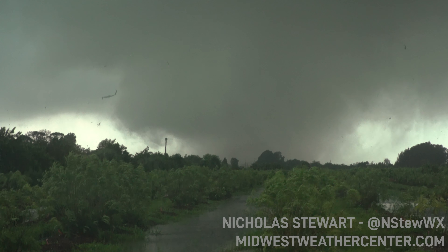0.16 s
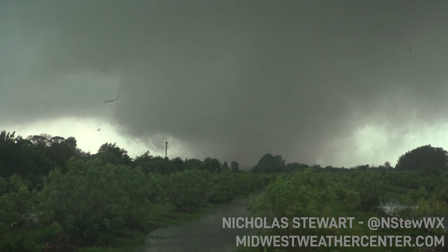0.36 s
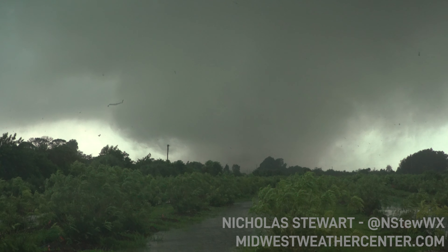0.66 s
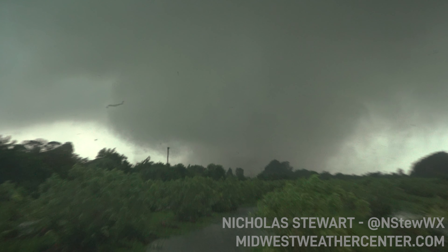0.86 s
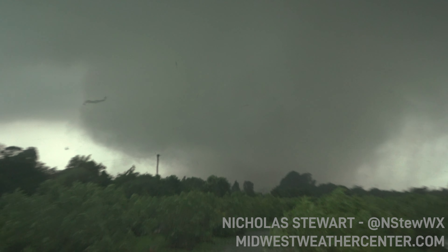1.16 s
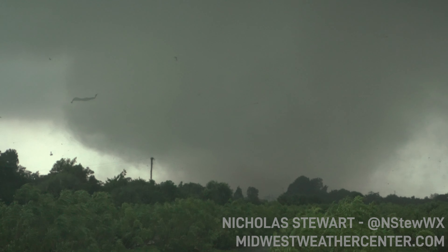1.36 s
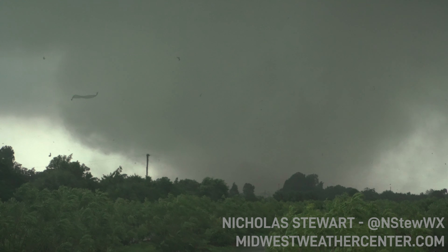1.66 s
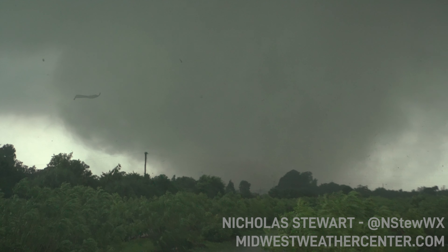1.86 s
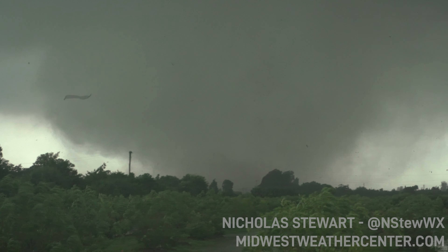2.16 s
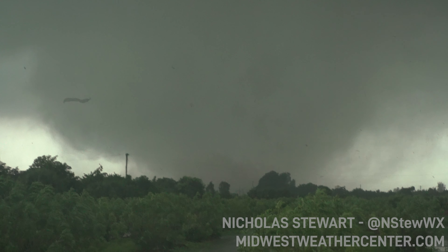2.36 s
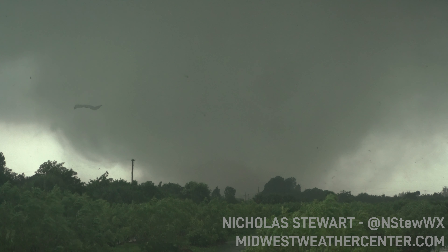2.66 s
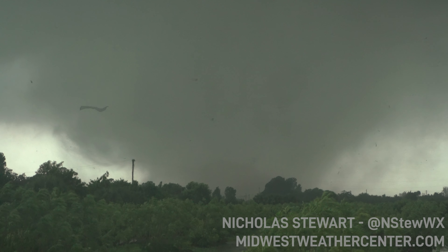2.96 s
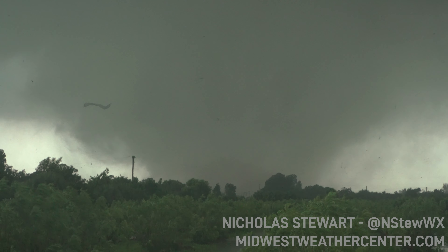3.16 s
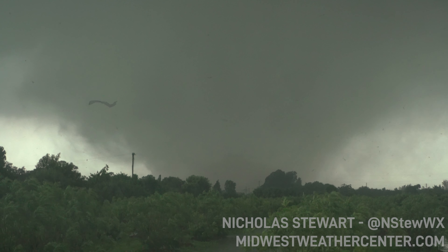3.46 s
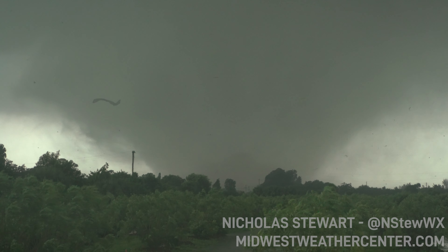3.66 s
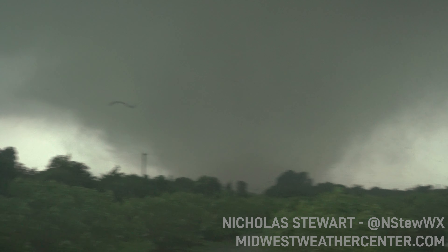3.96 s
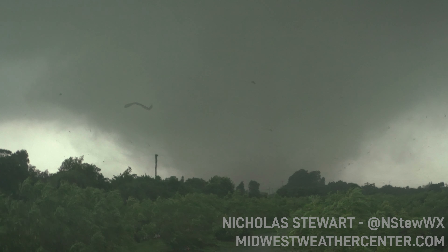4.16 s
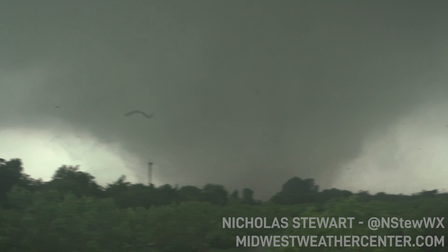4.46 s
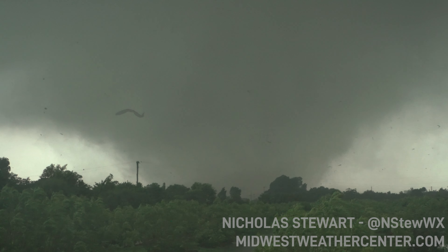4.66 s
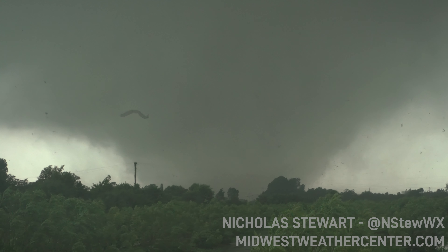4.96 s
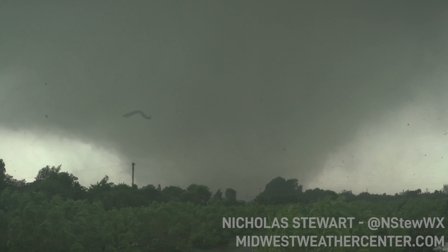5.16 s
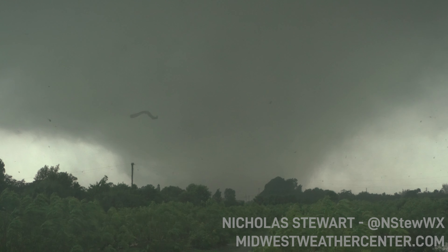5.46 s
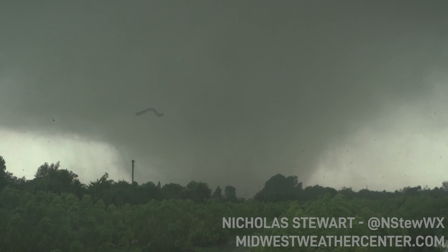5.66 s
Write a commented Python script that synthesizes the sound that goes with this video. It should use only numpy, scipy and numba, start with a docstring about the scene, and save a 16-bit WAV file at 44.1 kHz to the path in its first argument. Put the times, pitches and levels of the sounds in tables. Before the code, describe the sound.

Outdoors in open country, low, fluttering wind pounds the microphone over the constant deep roar of a far tornado. A small close mechanism gives a tick, a soft swish and a crisp snap. The gusts swell to their strongest, ease, then build again as the mechanism snaps a second time. Bushes hiss and insects trill barely audibly, and a distant bird peeps faintly near the end.

```python
"""A tornado roars steadily across open country, and its inflow wind buffets the microphone in deep gusts.
The hardest gusts duck the recorder's gain, which then creeps back. Behind the wind, leaves hiss in the
bushes, two insects trill and tick in the grass, and a bird peeps far off. Twice, close to the
microphone, a small mechanism ticks, slides with a soft swish and latches."""
import sys
import numpy as np
from scipy import signal
from scipy.fft import rfft, irfft
from scipy.io import wavfile
from scipy.ndimage import uniform_filter1d
from numba import njit

SR = 44100
rng = np.random.default_rng(int(sys.argv[2]) if len(sys.argv) > 2 else 0)


def dump_mix(stems):
    """Bounce the given channels to the path in sys.argv[1] as a 16-bit WAV at rate SR."""
    frames = np.atleast_2d(stems).T  # one column per channel
    limited = np.clip(frames, -1, 1)  # hard clip at full scale
    pcm = np.round(limited * 32767).astype(np.int16)
    wavfile.write(sys.argv[1], SR, pcm)


N = 255780
TIME = np.arange(N) / SR

# notes of the far bird: t/s, length/s, f/Hz, level/dB
BIRD_NOTES = [(0.03, .04, 3470, -61), (0.175, .055, 3470, -62), (5.47, .16, 1855, -55)]
# trills in the grass: t/s, length/s, level/dB
INSECT_TRILLS = [(0, .18, -78), (.45, 0.25, -73), (.72, .58, -77), (1.876, 0.86, -77.5),
                 (3.05, 0.71, -75.5), (3.846, .33, -74), (4.25, .4, -75.5), (5.22, .6, -74)]
# leaf hiss from the bushes: f/Hz, level/dB
LEAF_SPECTRUM = [(2000, -20), (3600, 3), (4600, 0), (5500, 5), (6400, -4), (7500, -1.5), (8300, -6),
                 (9200, -7), (10700, -15.5), (12000, -11.5), (14000, -19.5), (15500, -15)]

# cycles of the close mechanism: start t/s, catch t/s, latch t/s, swish level/dB, tick level/dB,
# catch level/dB, snap level/dB, snap f/Hz
LATCH_CYCLES = [(0.786, 1.4062, 1.4315, -66.5, -39, -30.5, -19, 5700),
                (4.109, 4.7282, 4.7515, -68.5, -44, -33.5, -17.5, 7200)]
# rubbing of its slide: f/Hz, level/dB
SLIDE_SPECTRUM = [(2000, -22), (4000, 4.5), (7500, 1.5), (10500, -3.5), (12300, -0.5), (14500, -9),
                  (15800, -9.5)]
# colour of its casing: f/Hz, level/dB
CASING_SPECTRUM = [(1100, -5), (1800, 1), (3000, 0), (4500, -2), (7700, -2), (9000, -12), (12000, -19),
                   (15500, -31)]
# low modes of the casing: f/Hz, level/dB, decay/s
KNOCK_MODES = [(1570, -4, .004), (1760, 0, 0.0039), (2530, 0, 0.0027), (3070, -5, 0.0018)]
# blows on the casing: t/s, level/dB, tilt/(dB per octave)
CASING_KNOCKS = [(0.787, -46, 1), (1.4075, -45, 0), (1.4325, -35.5, -10), (4.7287, -40, 7)]
# the snap and its chatter: t/s from the latch, level/dB against the snap, ratio to the snap's pitch
SNAP_CHATTER = [(-.006, -15.5, .85), (0, 0, 1), (.0048, -11.5, .95), (.0112, -14, .82)]

# the distant funnel: t/s, rumble level/dB, roar level/dB, rush level/dB
FUNNEL_LEVELS = [(0, -36, -37.5, -48.5), (.38, -36, -34, -47), (.65, -34.5, -37, -47),
                 (1.05, -30, -32.5, -45.5), (1.5, -31, -34.5, -46.5), (2.1, -34, -33, -46.5),
                 (2.33, -34, -33, -47.3), (2.55, -31, -35, -47.5), (3.0, -26.5, -33, -47),
                 (3.8, -32, -34, -47), (4.35, -31.5, -32.5, -46), (5.1, -31.5, -32, -46.5),
                 (5.8, -37.5, -33.5, -46.5)]
# its low rumble: f/Hz, level/dB
RUMBLE_SPECTRUM = [(70, -19), (125, -1.5), (170, 1), (240, -5), (300, -7.5), (450, -26)]
# its midrange roar: f/Hz, level/dB
ROAR_SPECTRUM = [(180, -24.5), (250, -2.5), (310, -1), (400, -2), (520, -5), (750, -11.5), (1000, -22),
                 (1500, -30.5), (3000, -56)]
# its rushing air: f/Hz, level/dB
RUSH_SPECTRUM = [(400, -13.5), (750, 0), (1000, 1.5), (1350, -4.5), (1750, -6.5), (2400, -12.5),
                 (2750, -15), (3000, -12), (3200, -16), (3550, -16.5), (4200, -26), (6000, -44)]

# steady wind on the microphone: t/s, level/dB
WIND_LEVELS = [(0, -32.5), (.45, -23.5), (.7, -24), (1.1, -21.5), (1.75, -19), (2.15, -20), (3.05, -15.5),
               (3.4, -19.5), (3.6, -23.5), (4.15, -20), (4.9, -17), (5.45, -14.5), (5.8, -18.5)]
# brief lulls in that wind: centre t/s, level change/dB
WIND_LULLS = [(1.5, -4), (2.165, -6), (2.82, -7), (2.985, -10), (3.12, -13), (4.02, -11), (4.211, -14.5),
              (4.52, -19), (5.0, -9), (5.1, -10), (5.425, -7)]
# gusts on top of it: centre t/s, length/s, level/dB, fast eddies' share of the power (0-1)
WIND_GUSTS = [(.82, 0.15, -20.5, 0.77), (0.998, 0.069, -21, 0.95), (1.171, 0.031, -13.5, 0.1),
              (1.297, 0.13, -16.5, 0.35), (1.419, 0.078, -13, 0.2), (1.585, 0.059, -11.5, 0.07),
              (2.344, 0.071, -10, 0), (2.477, 0.084, -6, 0.02), (2.629, 0.079, -5, 0.17),
              (2.731, 0.11, -6, 0.12), (2.899, 0.13, -6, 0.05), (4.287, 0.031, -13, 0.04),
              (4.37, 0.11, -15, 1), (4.645, 0.16, -13, 0.75), (4.722, 0.13, -12.5, 0.42),
              (4.872, 0.085, -15, 0.77), (5.2, 0.12, -14, 0.46), (5.318, 0.093, -9, 0),
              (5.503, .16, -15.5, 0.9), (5.626, 0.2, -12.5, 0.8), (5.746, 0.15, -10, 0.18)]
# large, deep eddies at the microphone: f/Hz, level/dB
DEEP_EDDY_SPECTRUM = [(8, -27), (15, -15), (26, -1), (44, 3), (58, -3.5), (75, -18), (120, -47)]
# small, fast eddies at the microphone: f/Hz, level/dB
FAST_EDDY_SPECTRUM = [(35, -23), (55, 1.5), (68, -0.5), (100, -4.5), (135, -13), (200, -28), (400, -45.5),
                      (900, -57)]


def undb(db):
    """Decibels to gain."""
    return 10 ** (np.asarray(db) / 20)


def unit(x):
    """Scale to rms 1."""
    return x / np.sqrt(np.mean(x ** 2))


def curves(table):
    """Each column after the first as a curve in time."""
    times, *columns = np.transpose(table)
    return [np.interp(TIME, times, column) for column in columns]


def envelope(start, attack_s, length_s, release_s):
    """Rise from the start, hold until the length is over, then fall."""
    age = TIME - start
    return np.clip(np.minimum(age / attack_s, 1 - (age - length_s) / release_s), 0, 1)


def arch(centre, length_s):
    """Half a sine wave of height 1 around the centre."""
    return np.cos(np.pi * np.clip((TIME - centre) / length_s, -.5, .5))


def drift(rate_hz):
    """Smooth random drift of rms 1, changing about rate_hz times a second."""
    hz = np.arange(N // 2 + 1) * SR / N
    return unit(irfft(rfft(rng.standard_normal(N)) * np.exp(-(hz / rate_hz) ** 2) * (hz > 0), N))


def colour(x, spectrum):
    """Filter by (f/Hz, level/dB) points, falling steeply beyond the ends; rms 1."""
    hz, db = np.transpose(spectrum)
    bins = np.maximum(np.arange(len(x) // 2 + 1) * SR / len(x), 1)
    gain = undb(np.interp(np.log(bins), np.log(hz), db))
    skirts = np.minimum(bins / hz[0], 1) ** 2 * np.minimum(hz[-1] / bins, 1) ** 2
    return unit(irfft(rfft(x) * gain * skirts, len(x)))


def churn(spectrum, depth_db, rate_hz, octaves=9):
    """Noise whose octaves swell and sink separately."""
    noise = rfft(rng.standard_normal(N))
    hz = np.arange(len(noise)) * SR / N
    octave = np.clip(np.log2(hz / 60 + 1e-9), 0, octaves - 1)
    bands = (irfft(noise * np.maximum(1 - abs(octave - k), 0), N) for k in range(octaves))
    return colour(sum(band * undb(depth_db * drift(rate_hz)) for band in bands), spectrum)


def eddies(spectrum, span_s):
    """Pressure swings of an unbroken train of eddies, about equally strong over each span."""
    pressure = colour(rng.standard_normal(N), spectrum)
    local_power = uniform_filter1d(abs(signal.hilbert(pressure)) ** 2, int(span_s * SR))
    return colour(pressure / np.sqrt(local_power), [(10, 0), (1000, 0)])


def far_bird(sag=.04):
    """Thin, nearly pure notes from far off, each sagging a little in pitch."""
    wobble = 1 + .0054 * drift(60)
    out = np.zeros(N)
    for start, length_s, hz, level_db in BIRD_NOTES:
        progress = np.clip((TIME - start) / length_s, 0, 1)
        pitch = hz * wobble * (1 - sag * (progress - .5))
        tone = np.sqrt(2) * np.sin(2 * np.pi * np.cumsum(pitch) / SR)
        out += undb(level_db) * np.sin(np.pi * progress) * tone
    return out


def ticking_insect(pulse_hz=23.5, length_s=.022, level_db=-85):
    """An insect in the grass flutters in short, even pulses, very high and faint."""
    voice = [(9800, -12), (11500, 0), (12300, 0), (13800, -6), (15000, -18)]  # f/Hz, level/dB
    cycles = np.cumsum(pulse_hz * (1 + .02 * drift(3))) / SR
    age_s = cycles % 1 / pulse_hz
    pulses = np.sin(np.pi * np.minimum(age_s / length_s, 1)) * undb(1.5 * drift(15))
    return undb(level_db) * colour(pulses * rng.standard_normal(N), voice)


def trilling_insect(carrier_hz=9090, stroke_hz=63, bend_hz=220, waver_hz=50, idle_db=-81):
    """Another trills in the grass; each wing stroke is a short high note that arches in pitch."""
    effort = undb(idle_db)  # it never quite stops
    for start, length_s, level_db in INSECT_TRILLS:
        effort = np.maximum(effort, undb(level_db) * envelope(start, .083, length_s, .17))
    stroke_phase = np.cumsum(stroke_hz * (1 + .008 * drift(6))) / SR % 1
    pressure = np.sin(np.pi * stroke_phase) ** 2
    hz = carrier_hz + bend_hz * (pressure - .8) + waver_hz * drift(250)
    tone = np.sin(2 * np.pi * np.cumsum(hz) / SR)
    return effort * undb(1.4 * drift(40)) * unit(pressure ** 2 * tone)


def bushes(level_db=-64.5):
    """Countless leaf contacts in the windblown bushes merge into a soft hiss."""
    contacts = rng.standard_normal(N) * undb(1.4 * rng.exponential(size=N))
    return undb(level_db + .27 * drift(14)) * colour(contacts, LEAF_SPECTRUM)


def slide(attack_s=.02, push_s=.475, swell_db=9.5, return_db=-3):
    """Close by, a sliding part rubs harder and harder, stops, then glides softly back."""
    rubbing = 0
    for start, _, latch_s, level_db, *_ in LATCH_CYCLES:
        travel = np.clip((TIME - start) / push_s, 0, 1)
        push = envelope(start, attack_s, push_s, release_s=.11) * undb(swell_db * travel ** 3)
        back = envelope(latch_s, attack_s, length_s=.4, release_s=.4) * undb(return_db)
        rubbing += undb(level_db) * (push + back)
    return rubbing * churn(SLIDE_SPECTRUM, depth_db=1.5, rate_hz=40)


def grind(level_db=-54, fade_s=.035, lead_s=.004):
    """The parts grate as they close and settle, hardest just before the latch snaps."""
    pressure = sum(np.exp(-abs(TIME - latch_s + lead_s) / fade_s) for _, _, latch_s, *_ in LATCH_CYCLES)
    contacts = rng.standard_normal(N) * undb(2.5 * np.minimum(rng.exponential(size=N), 6))
    return undb(level_db) * pressure * colour(contacts, CASING_SPECTRUM)


def knock(start, level_db, tilt_db):
    """A blow rings the casing's low modes, each blow with its own duller or brighter tone."""
    age = np.maximum(TIME - start, 0)
    out = np.zeros(N)
    for hz, mode_db, decay_s in KNOCK_MODES:
        gain = undb(level_db + mode_db + tilt_db * np.log2(hz / KNOCK_MODES[0][0]))
        out += gain * np.exp(-age / decay_s) * np.sin(2 * np.pi * hz * age)
    return out


def click(start, peak_db, scrape_decay_s, ring_hz, bandwidth_hz=900):
    """One contact: an impulse and a short scrape ring the casing, favouring one pitch."""
    size, lead = 1024, 64  # samples
    t = TIME[:size]
    impulse = t == 0
    contact = impulse + .25 * rng.standard_normal(size) * np.exp(-t / scrape_decay_s)
    ring = impulse + .12 * np.exp(-np.pi * bandwidth_hz * t) * np.cos(2 * np.pi * ring_hz * t)
    sound = colour(np.pad(signal.fftconvolve(contact, ring), lead), CASING_SPECTRUM)
    return np.pad(undb(peak_db) * sound / abs(sound).max(), (int(start * SR) - lead, N))[:N]


def latch(scrape_decay_s=.0025, snap_decay_s=.0004):
    """Near the microphone: a tick, then the catch scrapes, snaps home and chatters; the casing knocks."""
    out = sum(knock(*blow) for blow in CASING_KNOCKS)
    for start, catch_s, latch_s, _, tick_db, catch_db, snap_db, snap_hz in LATCH_CYCLES:
        out += click(start, tick_db, scrape_decay_s, ring_hz=3800)
        out += click(catch_s, catch_db, scrape_decay_s, ring_hz=7200)
        for offset_s, offset_db, ratio in SNAP_CHATTER:
            out += click(latch_s + offset_s, snap_db + offset_db, snap_decay_s, ratio * snap_hz)
    return out


def tornado():
    """The funnel roars as eddies of each size come and go; distance leaves little of its treble."""
    rumble_db, roar_db, rush_db = curves(FUNNEL_LEVELS)
    rumble = eddies(RUMBLE_SPECTRUM, span_s=.52)
    roar = churn(ROAR_SPECTRUM, depth_db=.7, rate_hz=3.5)
    rush = churn(RUSH_SPECTRUM, depth_db=1.2, rate_hz=9)
    return undb(rumble_db) * rumble + undb(roar_db) * roar + undb(rush_db) * rush


def wind_on_microphone(fast_db=-4, lull_s=.081):
    """The inflow rolls large and small eddies over the microphone, swelling in gusts, sinking in lulls."""
    wind_db, = curves(WIND_LEVELS)
    lull_db = sum(change_db * arch(centre, lull_s) for centre, change_db in WIND_LULLS)
    deep_power = undb(wind_db + lull_db) ** 2
    fast_power = undb(wind_db + fast_db + .22 * lull_db) ** 2  # fast eddies sink less
    for centre, length_s, level_db, fast_share in WIND_GUSTS:
        gust_power = (undb(level_db) * arch(centre, length_s)) ** 2
        deep_power += (1 - fast_share) * gust_power
        fast_power += fast_share * gust_power
    deep = np.sqrt(deep_power) * eddies(DEEP_EDDY_SPECTRUM, span_s=.14)
    fast = np.sqrt(fast_power) * eddies(FAST_EDDY_SPECTRUM, span_s=.077)
    return deep + fast


def scene():
    """Storm, countryside and the close mechanism at one microphone."""
    storm = wind_on_microphone() + tornado()
    countryside = bushes() + trilling_insect() + ticking_insect() + far_bird()
    mechanism = slide() + grind() + latch()
    return (storm + countryside + mechanism)[None]


@njit
def gain_cut(wanted_db, attack_s, recovery_db_per_s):
    """The recorder's gain control cuts quickly, then lets go at a steady rate."""
    out, cut_db = np.empty(len(wanted_db)), 0.
    for i in range(len(wanted_db)):
        if wanted_db[i] > cut_db:
            cut_db += (wanted_db[i] - cut_db) / (attack_s * SR)
        else:
            cut_db = max(cut_db - recovery_db_per_s / SR, 0.)
        out[i] = cut_db
    return out


def record(dry):
    """Hard gusts on the microphone duck the recorder's gain and it creeps back; the top treble is cut."""
    threshold_db, cut_per_db, top_hz = -9, .62, 15650
    over_db = 20 * np.log10(np.maximum(abs(dry[0]) / undb(threshold_db), 1))
    cut_db = gain_cut(cut_per_db * over_db, attack_s=.0042, recovery_db_per_s=3)
    lowpass = signal.ellip(10, .2, 80, top_hz, fs=SR, output="sos")
    return signal.sosfilt(lowpass, dry * undb(-cut_db))


dry = scene()
out = record(dry)
dump_mix(out)
```